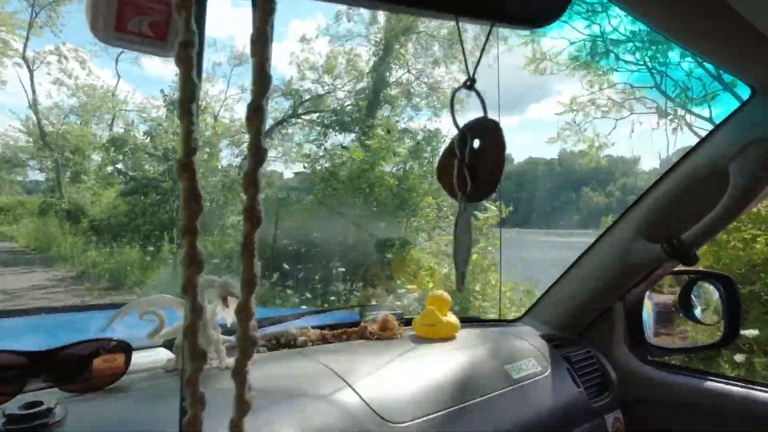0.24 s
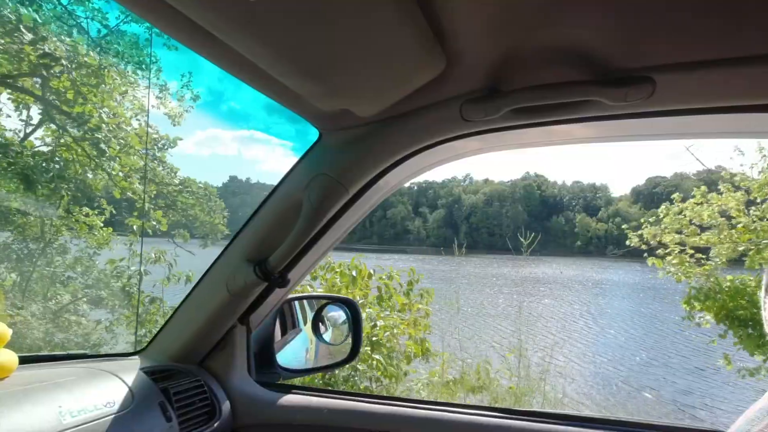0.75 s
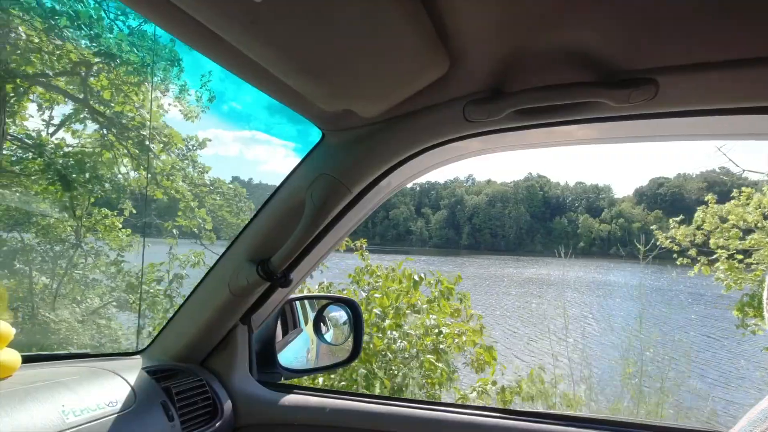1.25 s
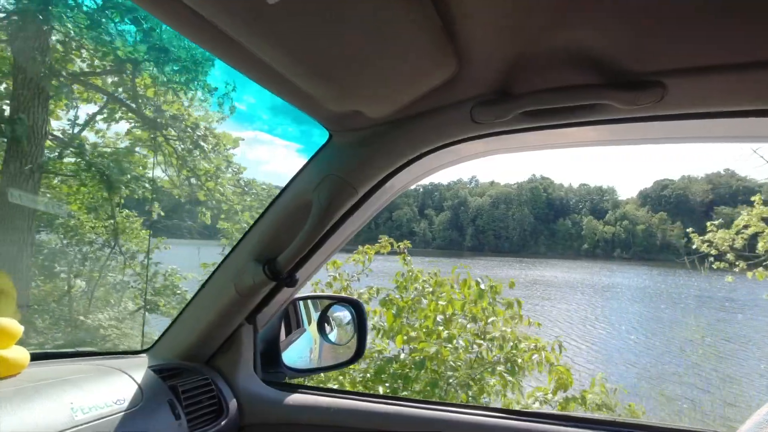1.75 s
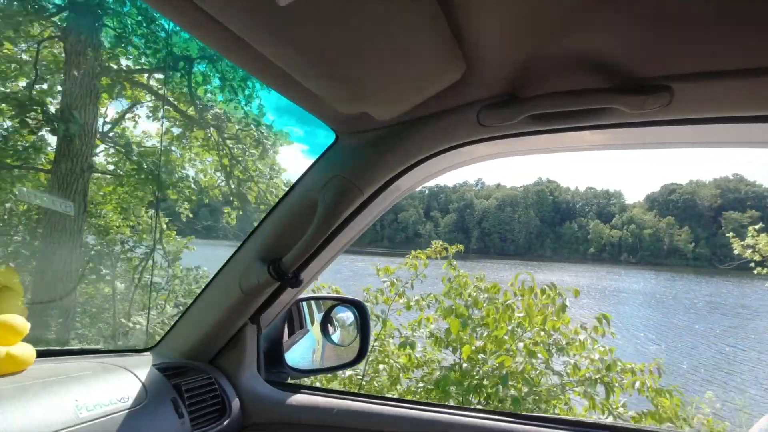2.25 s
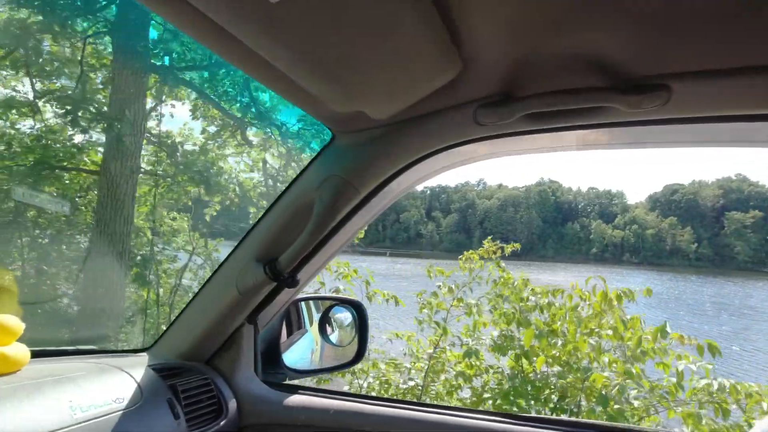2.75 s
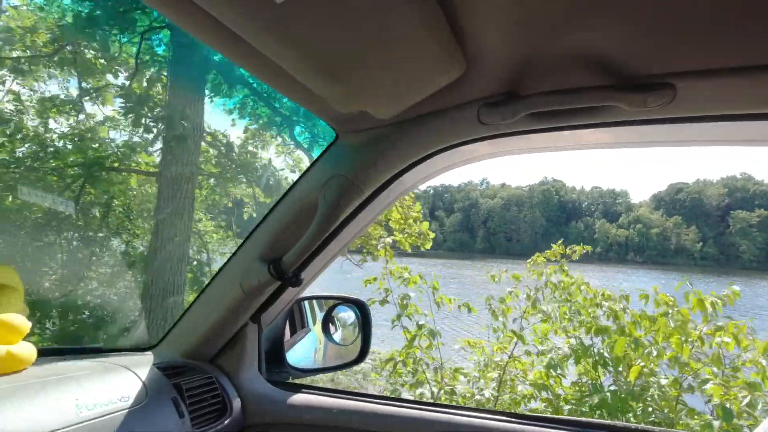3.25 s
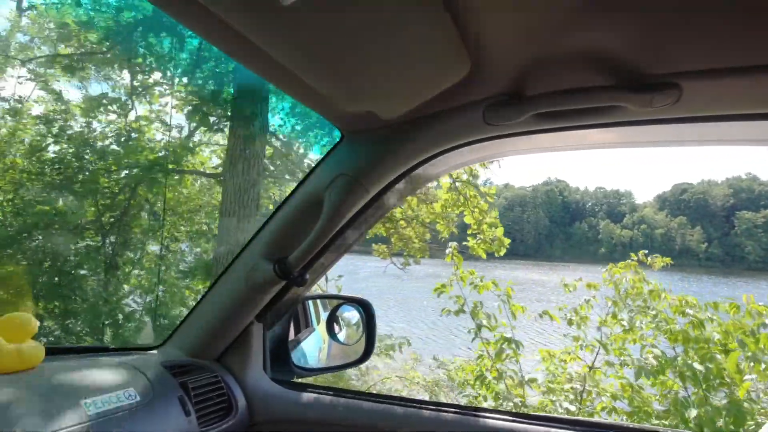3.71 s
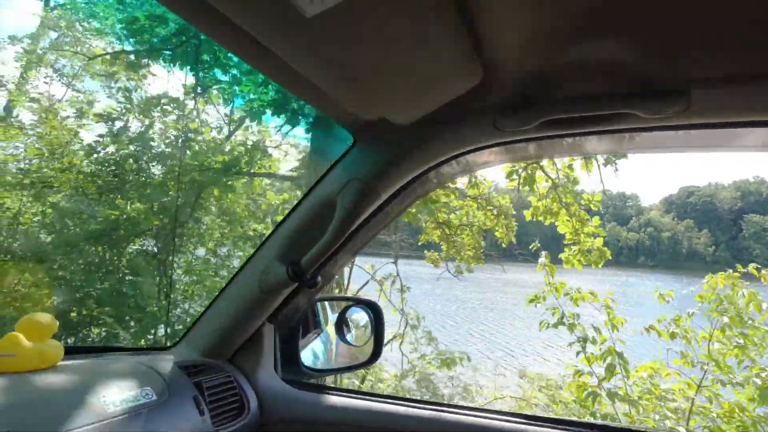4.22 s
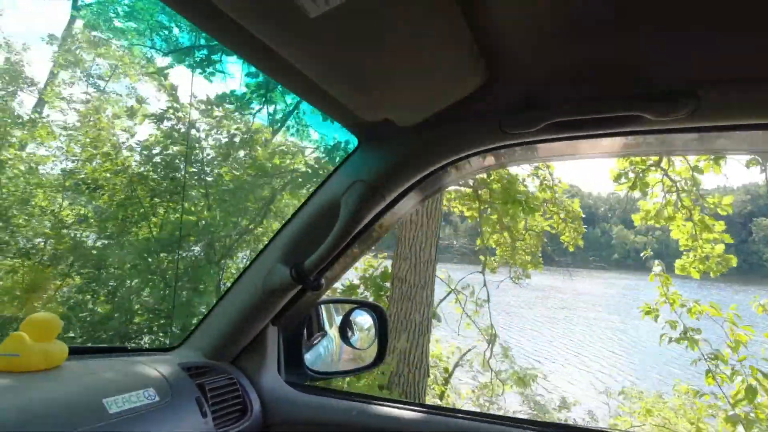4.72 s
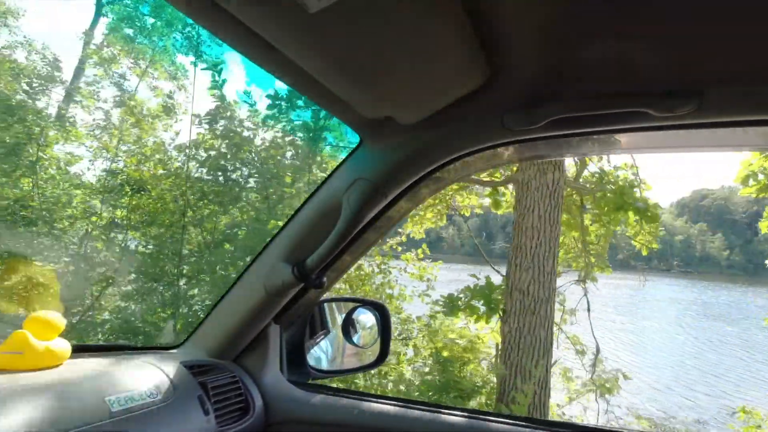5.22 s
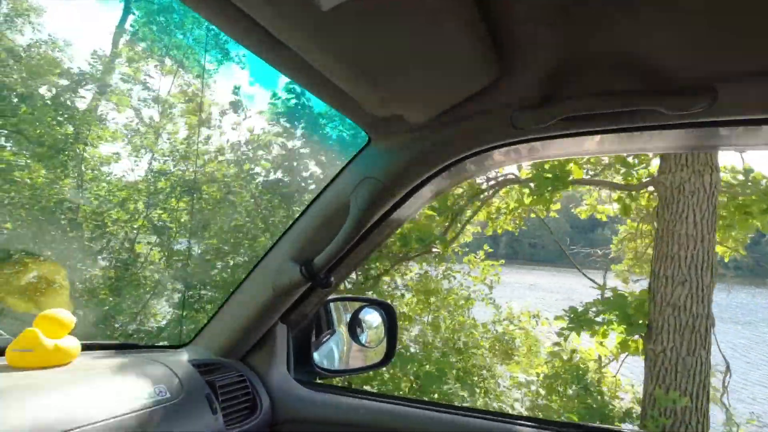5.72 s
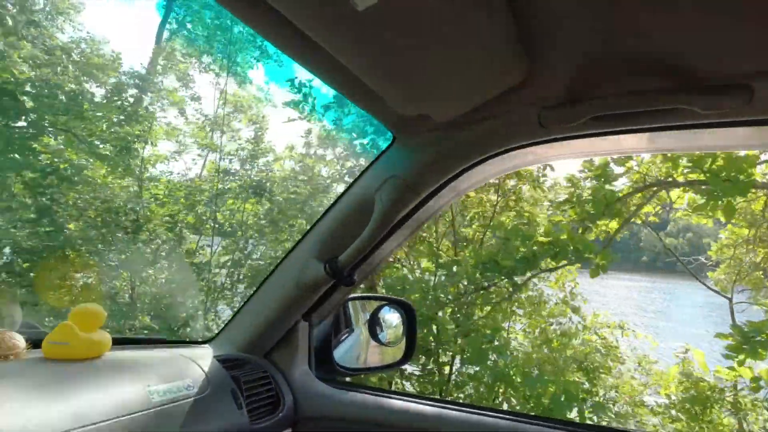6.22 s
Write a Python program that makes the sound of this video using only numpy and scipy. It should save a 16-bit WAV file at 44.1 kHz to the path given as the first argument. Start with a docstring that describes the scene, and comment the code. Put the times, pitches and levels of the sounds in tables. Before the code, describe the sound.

The front seat of a slowly rolling car, a window open, heard on a handheld stereo microphone. A faint low hum and dull tyre rumble, roar and soft hiss run throughout, heavier until about 2.5 s, then lighter on smoother road. Deep wind booms hit near 0.1, 0.4, 0.7 and 0.9 s. Dashboard parts knock in a quick clatter from 0.2 to 0.7 s, with small bead clicks; a brief metallic tink comes at 0.85 s and more knocks around 1.1 s. A boom at 1.5 s overlaps a stuttering trim creak, 1.4 to 1.95 s, with a sharp snap at 1.83 s. It is calmer until gusts at 3 s and 4.1 s. Very thin, high squeaks fade in runs from 3.75 to 5.6 s. From 4.4 s buffeting thickens; a knock falls at 5.56 s, and loud, ragged fluttering and low booming continue to the end at about 6.4 s.

```python
"""The front seat of a car that rolls slowly along a rough lakeside road with a side window open.
An engine hums through the floor; tyres rumble, roar and hiss as shaped noise, lighter once the road smooths.
Loose dashboard parts, beads and trim knock, click, creak and snap as short taps on damped modes.
A hanging metal trinket tinks once and squeaks in fading runs of sine tones.
In front of it all, gusts boom the cabin like a blown bottle and flutter on the two microphone ports."""
import sys
import numpy as np
from scipy import signal
from scipy.fft import rfft, irfft
from scipy.io import wavfile
from scipy.ndimage import uniform_filter1d

SR = 44100
rng = np.random.default_rng(int(sys.argv[2]) if len(sys.argv) > 2 else 0)


def dump_mix(stems):
    """Bounce the given channels to the path in sys.argv[1] as a 16-bit WAV at rate SR."""
    frames = np.atleast_2d(stems).T  # one column per channel
    limited = np.clip(frames, -1, 1)  # hard clip at full scale
    pcm = np.round(limited * 32767).astype(np.int16)
    wavfile.write(sys.argv[1], SR, pcm)


N = 285194
TIME = np.arange(N) / SR  # s
FREQS = np.maximum(np.arange(N // 2 + 1) * SR / N, 1)  # Hz


def undb(db):
    """Turn decibels into gain."""
    return 10 ** (np.asarray(db) / 20)


def unit(x):
    """Scale to rms 1."""
    return x / np.sqrt(np.mean(x ** 2))


def over_hz(points):
    """Join (Hz, value) points on a log-frequency axis."""
    hz, value = np.transpose(points)
    return np.interp(np.log(FREQS), np.log(hz), value)


def colour(points):
    """Gain of a (Hz, dB) spectrum that falls steeply beyond its ends."""
    below = np.minimum(FREQS / points[0][0], 1)
    above = np.minimum(points[-1][0] / FREQS, 1)
    return undb(over_hz(points)) * (below * above) ** 4


def resonance(hz, width_hz):
    """Complex response of one damped mode."""
    return 1 / (1 + 1j * (FREQS ** 2 - hz ** 2) / (FREQS * width_hz))


def shape(x, response):
    """Filter a sound by a frequency response."""
    return irfft(rfft(x) * response, N)


def curve(rows, axis=1):
    """Gain that follows one dB column of a table over time."""
    rows = np.array(rows)
    return undb(np.interp(TIME, rows[:, 0], rows[:, axis]))


def walk(rate_hz):
    """Smooth random wandering of rms 1, mostly slower than the given rate."""
    return unit(shape(rng.standard_normal(N), 1 / (1 + (FREQS / rate_hz) ** 4)))


def even(x, seconds):
    """Hold a noise near rms 1 over the given time, so that only its fast churning is left."""
    size = max(int(seconds * SR), 2)
    power = np.mean(np.atleast_2d(x) ** 2, axis=0)
    smooth_power = uniform_filter1d(uniform_filter1d(power, size), size)
    return x / np.sqrt(smooth_power + 1e-12)


def swells(rows, attack_s, release_s):
    """Envelope of (s, hold s, dB) events: a smooth rise up to s, a hold, an exponential release."""
    power = np.zeros(N)
    for start_s, hold_s, level_db in rows:
        early = np.maximum(start_s - TIME, 0)
        late = np.maximum(TIME - start_s - hold_s, 0)
        fall = (early / attack_s) ** 2 + 2 * late / release_s
        power += undb(level_db) ** 2 * np.exp(-np.minimum(fall, 60))
    return np.sqrt(power)


# likeness of the cabin sound at the two ports: pitch_hz, correlation (no unit)
PORT_LIKENESS = [(40, 0.96), (150, 1), (500, 0.95), (1000, 0.81), (2000, 0.48), (4000, -0.073),
                 (9000, 0.042)]


def cabin_noise():
    """Diffuse noise at the two ports: alike in the bass, unrelated in the treble."""
    alike = np.clip(over_hz(PORT_LIKENESS), -.99, .99)
    mid, side = rng.standard_normal((2, N))
    difference = shape(side, np.sqrt((1 - alike) / (1 + alike)))
    return mid + difference * np.array([[1], [-1]])


def cabin_band(points):
    """Coloured diffuse noise whose middle has rms 1."""
    x = shape(cabin_noise(), colour(points))
    return x / np.std(x.mean(axis=0))


def engine(hum_hz=138, hum_db=-53, waver_hz=4, throb_db=6.0):
    """A soft hum through the floor: one sine that wavers in pitch and throbs in level."""
    phase = 2 * np.pi * np.cumsum(hum_hz + waver_hz * walk(19)) / SR
    return unit(np.sin(phase) * undb(throb_db * walk(18))) * undb(hum_db)


# stretches of broken road: start_s, hold_s, rumble_db
ROUGH_STRETCHES = [(0.05, 1, -30.5), (1.25, 0.77, -31), (2.27, 0.23, -33.5)]
# heavy drumming of the body: pitch_hz, density_db (relative, per Hz)
RUMBLE_SPECTRUM = [(30, 1.5), (45, -6), (62, -13.5), (90, 1), (128, 5), (165, -5), (230, -18), (400, -23)]
# lighter drumming on smooth road: pitch_hz, density_db (relative, per Hz)
SMOOTH_SPECTRUM = [(30, -1.5), (45, -3), (62, -6.5), (85, 0), (110, 0.5), (140, 3.5), (175, -1), (230, -15),
                   (400, -21)]
# two blocks, before and after the road turns smooth: time_s, roar_db, hiss_db (before the trims)
ROAD_LEVELS = [
    [(0.0, -52, -63.5), (0.14, -52.5, -63.5), (0.28, -52.5, -65), (0.45, -46, -64), (0.76, -51.5, -61.5),
     (1.28, -50.5, -61.5), (1.7, -51.5, -60.5), (2.36, -52.5, -60), (2.51, -50.5, -61)],
    [(2.56, -55.5, -63.5), (3.03, -56, -65), (3.9, -56.5, -63.5), (4.39, -56, -64), (5.07, -53.5, -60.5),
     (5.44, -56, -63), (5.66, -52.5, -61), (5.8, -52, -62), (6.05, -58, -61.5)],
]
# road roar: pitch_hz, density_db (relative)
ROAR_SPECTRUM = [(200, 0), (260, -5.5), (330, -4.5), (420, -9), (600, -9), (850, -11.5), (1200, -15),
                 (1600, -18), (2200, -18.5)]
# tyre hiss: pitch_hz, density_db (relative)
HISS_SPECTRUM = [(1800, -42), (2300, -1), (3000, 3.5), (4000, -1), (5400, -5.5), (6500, -13), (8000, -18),
                 (10000, -23)]


def tyres(smooth_db=-47.0, roar_db=5.0, hiss_db=-1, grit_db=1.5, bumps_db=0.94):
    """The body drums on the road; bumps and grit under the tread roughen the roar and hiss."""
    road = np.concatenate(ROAD_LEVELS)
    drumming = swells(ROUGH_STRETCHES, attack_s=0.15, release_s=0.029)
    rumble = even(cabin_band(RUMBLE_SPECTRUM), seconds=0.11) * drumming
    rolling = cabin_band(SMOOTH_SPECTRUM) * undb(smooth_db)
    roar = cabin_band(ROAR_SPECTRUM) * curve(road) * undb(roar_db + bumps_db * walk(25))
    hiss = cabin_band(HISS_SPECTRUM) * curve(road, axis=2) * undb(hiss_db + grit_db * walk(110))
    return rumble + rolling + roar + hiss


def rattle(hits, modes, tap_db, chatter_db, rise_s, chatter_s, tail_s, tail_db):
    """Each blow taps damped modes; the contact chatters for a moment and the cabin adds a short tail."""
    taps, chatter = np.zeros(N), np.zeros(N)
    for start_s, level_db in hits:
        taps[int(start_s * SR)] += undb(level_db)
        near = (TIME > start_s) & (TIME < start_s + .3)
        age = TIME[near] - start_s
        contact = np.exp(-(age / chatter_s) ** 2) + undb(tail_db) * np.exp(-age / tail_s)
        chatter[near] += undb(level_db) * (1 - np.exp(-age / rise_s)) * contact
    # modes alternate in polarity
    body = sum((-1) ** k * undb(db) * resonance(hz, width) for k, (hz, width, db) in enumerate(modes))
    # a small part radiates little below its lowest mode, and soft contact little above its highest
    body = body * colour([(0.91 * modes[0][0], 0), (modes[-1][0], 0)])
    ring = shape(taps, body) / np.max(abs(irfft(body, N)))
    grain = even(shape(cabin_noise(), body), seconds=0.0021)
    return undb(tap_db) * ring + undb(chatter_db) * chatter * grain


# loose things knocking and rebounding: start_s, level_db (before the tap and chatter trims)
KNOCK_HITS = [(0.008, -42), (0.203, -40.5), (0.311, -40), (0.339, -34.5), (0.372, -38), (0.409, -28.5),
              (0.441, -36), (0.483, -31.5), (0.513, -38.5), (0.555, -31.5), (0.585, -42), (0.621, -33.5),
              (0.656, -36.5), (0.687, -45), (1.058, -34), (1.098, -44), (1.131, -40), (1.158, -38.5),
              (1.254, -40.5), (1.435, -40), (1.508, -39.5), (1.686, -38), (5.562, -33.5)]
# the dashboard: pitch_hz, width_hz, level_db (relative)
DASHBOARD_MODES = [(610, 150, 11), (837, 30, 16), (1030, 260, 2.5), (1430, 120, 8.5), (1740, 230, 1),
                   (2000, 16, 9), (2200, 290, -10.5), (3050, 230, -16)]


def dashboard_knocks():
    """Loose things knock and rebound in the dashboard and excite its modes."""
    return rattle(KNOCK_HITS, DASHBOARD_MODES, tap_db=-5, chatter_db=-5.0,
                  rise_s=0.002, chatter_s=0.02, tail_s=0.021, tail_db=-23.0)


# beads touching: start_s, level_db (before the tap and chatter trims)
BEAD_HITS = [(0.048, -50), (0.3095, -42.5), (0.3725, -47.5), (0.974, -59), (1.0345, -45), (1.1004, -61),
             (1.6841, -57)]
# a plastic bead: pitch_hz, width_hz, level_db (relative)
PLASTIC_MODES = [(810, 400, 7), (1930, 68, 5.5), (2140, 54, 14.5), (2420, 68, 13.5), (3450, 220, -10),
                 (3980, 130, 4.5)]


def bead_clicks():
    """Plastic beads click together: small, bright taps with a longer faint tail."""
    return rattle(BEAD_HITS, PLASTIC_MODES, tap_db=9.5, chatter_db=7.5,
                  rise_s=0.0027, chatter_s=0.0082, tail_s=0.09, tail_db=-19)


# slips under a growing load, fairly even, then hurrying: start_s, level_db (before the trims)
TRIM_SLIPS = [(1.437, -35.5), (1.474, -31.5), (1.508, -32), (1.545, -31), (1.585, -29.5), (1.629, -28.5),
              (1.669, -30), (1.719, -30), (1.768, -31), (1.808, -28.5), (1.83, -30), (1.848, -29.5),
              (1.87, -41), (1.881, -30), (1.892, -31.5), (1.916, -34), (1.944, -31.5), (1.953, -36)]
# the creaking trim panel: pitch_hz, width_hz, level_db (relative)
PANEL_MODES = [(328, 140, -4), (480, 66, 7.5), (574, 91, 1), (900, 320, -13), (1580, 84, -15),
               (1860, 98, -26.5), (2300, 160, -20.5)]


def trim_creak(rebound_s=0.018, rebound_db=-10):
    """Stick and slip: the trim jerks along in small slips and springs back once after each."""
    rebounds = [(start_s + rebound_s, level_db + rebound_db) for start_s, level_db in TRIM_SLIPS]
    return rattle(list(TRIM_SLIPS) + rebounds, PANEL_MODES, tap_db=-0.5, chatter_db=-13.0,
                  rise_s=0.0022, chatter_s=0.013, tail_s=0.021, tail_db=-5.5)


# the trim snaps free: start_s, level_db (before the tap and chatter trims)
SNAP_HITS = [(1.8262, -46.5), (1.848, -60), (1.874, -61), (1.889, -61)]
# the trim as it snaps: pitch_hz, width_hz, level_db (relative)
FREED_MODES = [(1540, 57, 8.5), (1910, 92, 5), (2500, 320, -8), (3250, 870, -9.5)]


def trim_snap():
    """The trim snaps free: one sharp tap and weaker ones ring its higher modes."""
    return rattle(SNAP_HITS, FREED_MODES, tap_db=12, chatter_db=5,
                  rise_s=0.0015, chatter_s=0.0091, tail_s=0.02, tail_db=-1)


# the metal is struck: start_s, level_db (before the mode levels and trim)
TINK_HITS = [(0.851, -38.5)]
# ringing metal: pitch_hz, level_db (relative), t60_s (before the ring damps it)
METAL_MODES = [(3440, -3, .55), (9814, -1, .1), (9920, -4, .08)]
# swings, each starting a run of squeaks: start_s, level_db (before the trim), pitch_hz, fade_db (per squeak)
TRINKET_SWINGS = [(3.749, -55, 8580, -7), (4.071, -64, 8720, -5), (4.307, -56.5, 8700, -21),
                  (4.505, -54, 8740, -6), (4.631, -50, 8700, -7), (5.07, -61, 8790, -6),
                  (5.19, -64.5, 8800, -4), (5.38, -54, 8730, -7), (5.445, -52, 8770, -7)]


def trinket(tink_db=-6, stop_s=0.067, squeak_db=-5, squeak_s=0.0075, gap_s=0.062, count=4,
            waver_hz=32, echo_db=-10, echo_s=0.15, lower_hz=8470, lower_db=-13):
    """A small metal pendant rings once and gives runs of thin squeaks as it swings on its ring."""
    ports = np.array([[0], [np.pi / 2]])  # such short waves reach the two ports out of step

    tink = np.zeros((2, N))
    for start_s, level_db in TINK_HITS:
        age = np.maximum(TIME - start_s, 0)
        # the pendant swings back against its ring, which damps it
        free = 1 / (1 + (age / stop_s) ** 12)
        onset = 1 - np.exp(-age / 0.0019)
        for hz, mode_db, t60_s in METAL_MODES:
            ring = np.sin(2 * np.pi * hz * age + ports) * np.exp(-np.log(1000) * age / t60_s)
            tink += undb(level_db + mode_db + tink_db) * ring * onset * free

    rubbing = np.zeros(N)
    for swing_s, level_db, _, fade_db in TRINKET_SWINGS:
        for k in range(count):
            start_s = swing_s + k * gap_s
            near = (TIME > start_s) & (TIME < start_s + .25)
            age = TIME[near] - start_s
            pulse = np.exp(-(age / squeak_s - 1.3) ** 2)
            echo = undb(echo_db) * np.exp(-age / echo_s)
            rub = (pulse + echo) * (1 - np.exp(-age / 0.00087))
            rubbing[near] = np.maximum(rubbing[near], undb(level_db + k * fade_db) * rub)

    def tone(hz):
        """A sine with a restless pitch."""
        return np.sin(2 * np.pi * np.cumsum(hz + waver_hz * walk(130)) / SR + ports)

    # each swing holds its pitch until the next
    times, _, pitches, _ = np.transpose(TRINKET_SWINGS)
    pitch = pitches[np.maximum(np.searchsorted(times, TIME) - 1, 0)]
    # a weaker mode of the ring sounds just below each squeak
    squeak = tone(pitch) + undb(lower_db) * tone(lower_hz)
    return tink + undb(squeak_db) * rubbing * squeak


# gusts that set the cabin booming: start_s, hold_s, level_db
BOOM_GUSTS = [(0.118, 0.023, -11.5), (0.396, 0.026, -16), (0.48, 0.016, -18.5), (0.715, 0.016, -19),
              (0.895, 0.065, -26.5), (1.28, 0.25, -46), (1.51, 0.11, -12), (1.68, 0.093, -22),
              (1.944, 0.0088, -17), (2.965, 0.03, -20), (3.005, 0.086, -16), (3.93, 0.08, -50),
              (4.02, 0.08, -44), (4.11, 0.1, -11), (4.385, 0.1, -21.5), (4.91, 0.15, -23.5),
              (5.12, 0.068, -11.5), (5.35, 0.1, -10), (5.55, 0.049, -12), (5.705, 0.03, -9),
              (5.76, 0.083, -18), (5.94, 0.52, -13)]


def cabin_boom(boom_hz=40.5, width_hz=8.6, thrust_db=-11, surge_db=0.5):
    """Gusts ring the cabin air: the window is the neck and the cabin the belly of a resonator."""
    gain = swells(BOOM_GUSTS, attack_s=0.012, release_s=0.021) * undb(surge_db * walk(11))
    cavity = resonance(boom_hz, width_hz) * resonance(boom_hz, width_hz=24.3)
    boom = even(shape(rng.standard_normal(N), cavity), seconds=0.055)
    # the swinging air pushes a little differently on each port
    push = resonance(boom_hz, width_hz=15.0) ** 2
    thrust = even(shape(rng.standard_normal((2, N)), push), seconds=0.097)
    return gain * (boom + undb(thrust_db) * thrust)


# buffets of broken air on the ports: start_s, hold_s, level_db, small_eddies_db (before the fierceness)
PORT_BUFFETS = [(0.712, 0.013, -18.5, 7.5), (0.891, 0.013, -20, -28), (1.947, 0.0083, -17.5, 16),
                (2.97, 0.077, -23, -16), (3.028, 0.012, -12, -17), (3.082, 0.012, -25.5, -21),
                (4.098, 0.011, -18.5, -13.5), (4.166, 0.021, -12, -7.5), (4.253, 0.067, -29.5, -11),
                (4.348, 0.016, -21.5, -7), (4.398, 0.049, -14, 4), (4.528, 0.092, -26.5, -12),
                (4.654, 0.14, -39.5, -3), (4.822, 0.019, -17, -18), (4.893, 0.039, -20, 17.5),
                (4.987, 0.034, -19.5, 0.5), (5.035, 0.04, -21, -2), (5.113, 0.027, -16, 10),
                (5.202, 0.054, -24.5, -9), (5.304, 0.038, -16.5, 10.5), (5.345, 0.017, -17.5, 7.5),
                (5.405, 0.021, -21, -20), (5.538, 0.027, -24.5, 11), (5.566, 0.042, -10.5, -3),
                (5.615, 0.039, -12.5, 4), (5.705, 0.051, -22.5, 2), (5.812, 0.026, -25, 7.5),
                (5.868, 0.025, -18, 9), (5.905, 0.032, -15.5, 14.5), (5.96, 0.027, -18.5, 11),
                (5.991, 0.041, -15.5, 6.5), (6.049, 0.027, -14.5, 11.5), (6.111, 0.03, -24, 17),
                (6.17, 0.023, -19, 16), (6.192, 0.024, -17, -1), (6.241, 0.013, -19, 10),
                (6.289, 0.015, -18, 15.5), (6.326, 0.017, -20.5, 11), (6.376, 0.025, -13, 3)]
# churning eddies: pitch_hz, density_db (relative, per Hz)
EDDY_SPECTRUM = [(25, 2.5), (45, -9.5), (80, 4), (130, 2), (170, -2), (205, -8), (250, -13.5), (320, -19),
                 (420, -29), (560, -39.5), (750, -55)]


def port_buffets(wake_db=-13.5, wake_s=0.054, shared=0.37, small_hz=270, fierce_db=-22,
                 flutter_db=1.5, ragged_db=2):
    """Gusts shed eddies over each port, with weak turbulence trailing each buffet."""
    buffets = np.array(PORT_BUFFETS)
    blows = buffets[:, :3]
    attack_s = 0.0086
    wake = undb(wake_db) * swells(blows, attack_s, wake_s)
    gain = np.hypot(swells(blows, attack_s, release_s=0.013), wake)
    # eddies are smaller than the gap between the ports, so each port mostly gets its own
    churn = rng.standard_normal((2, N)) + shared * rng.standard_normal(N)
    eddies = even(shape(churn, colour(EDDY_SPECTRUM)), seconds=0.02) * undb(flutter_db * walk(39))
    # slow air has mostly large, dull eddies; fast air breaks into ragged small ones
    large = shape(eddies, 1 / (1 + (FREQS / small_hz) ** 6))
    fierce = gain / (gain + undb(fierce_db))
    middles_s = buffets[:, 0] + buffets[:, 1] / 2
    broken = undb(np.interp(TIME, middles_s, buffets[:, -1]))
    small = (eddies - large) * fierce * broken * undb(ragged_db * walk(42))
    return gain * (large + small)


def scene():
    """Engine and tyres behind, the small noises of the cabin between, the wind in front."""
    background = engine() + tyres()
    cabin_parts = dashboard_knocks() + bead_clicks() + trim_creak() + trim_snap() + trinket()
    wind = cabin_boom() + port_buffets()
    return background + cabin_parts + wind


def record(dry, bass_hz=18, top_hz=10700, fade_s=.004):
    """Drop the deepest bass, round off peaks near full scale, fade both ends and cut the top."""
    dry = signal.sosfilt(signal.butter(2, bass_hz, "high", fs=SR, output="sos"), dry)
    dry = dry / (1 + dry ** 10) ** (1 / 10)
    dry = dry * np.minimum(np.minimum(TIME, TIME[-1] - TIME) / fade_s, 1)
    return signal.sosfilt(signal.ellip(8, .2, 70, top_hz, fs=SR, output="sos"), dry)


dry = scene()
out = record(dry)
dump_mix(out)
```